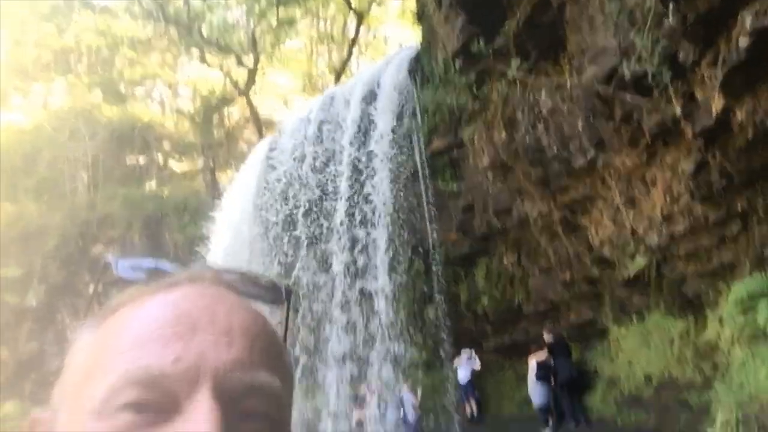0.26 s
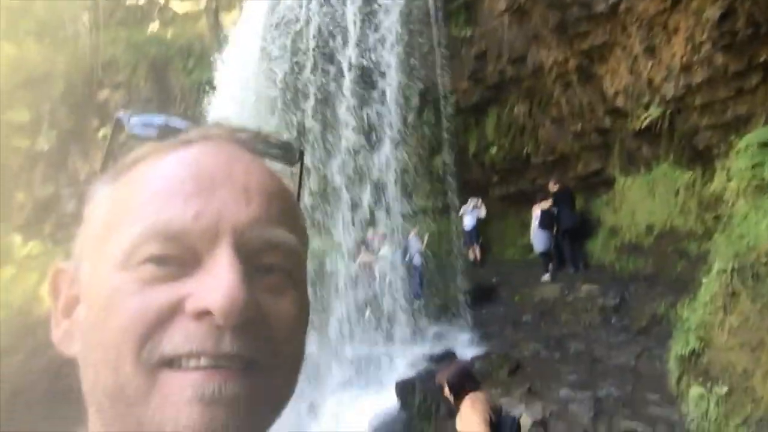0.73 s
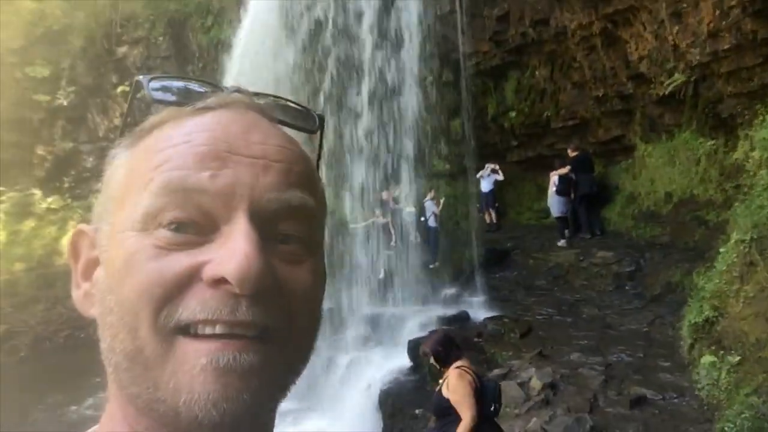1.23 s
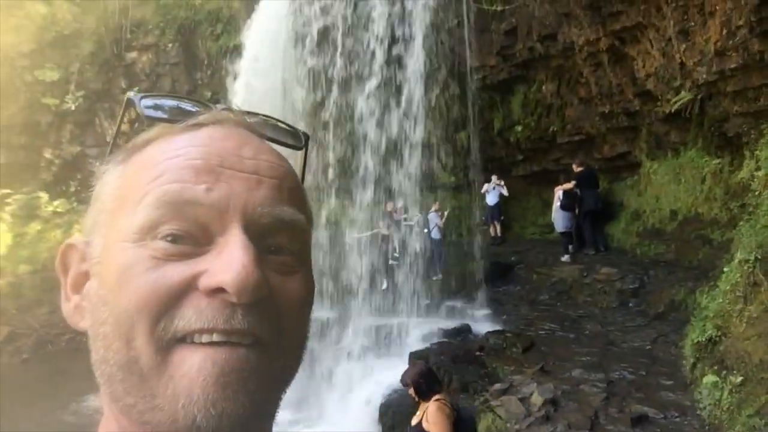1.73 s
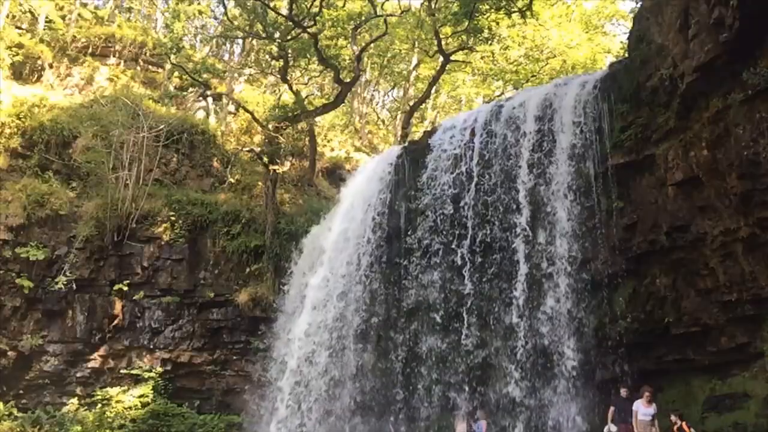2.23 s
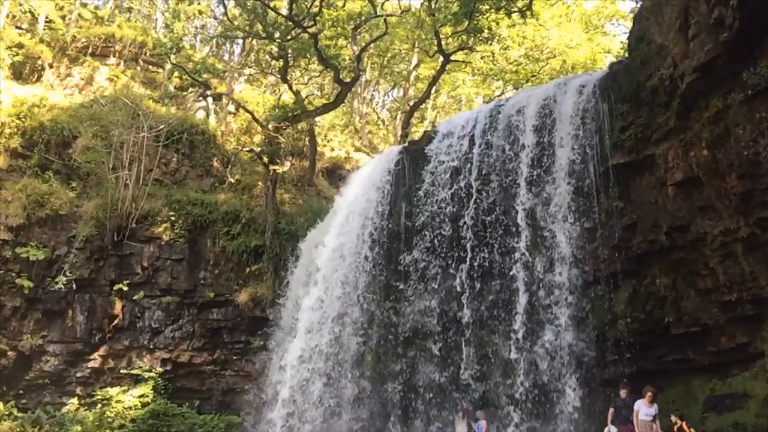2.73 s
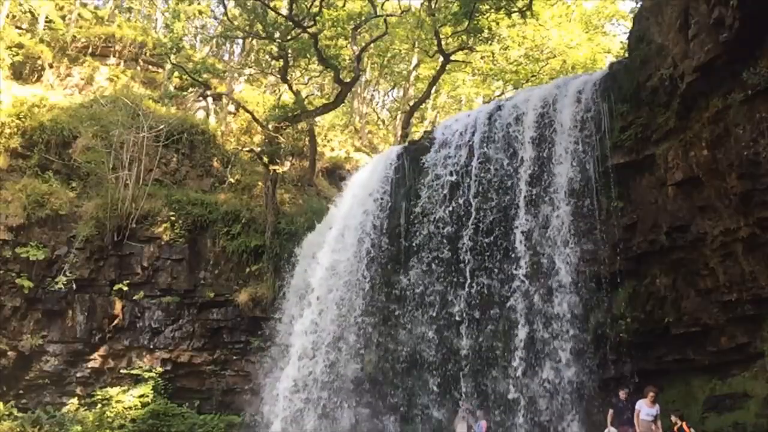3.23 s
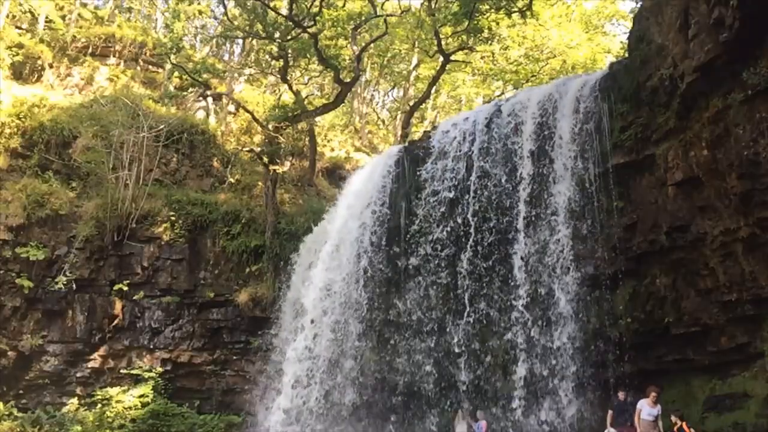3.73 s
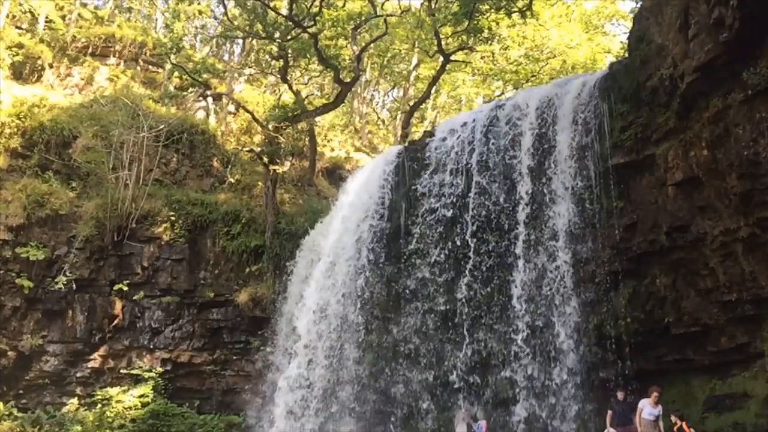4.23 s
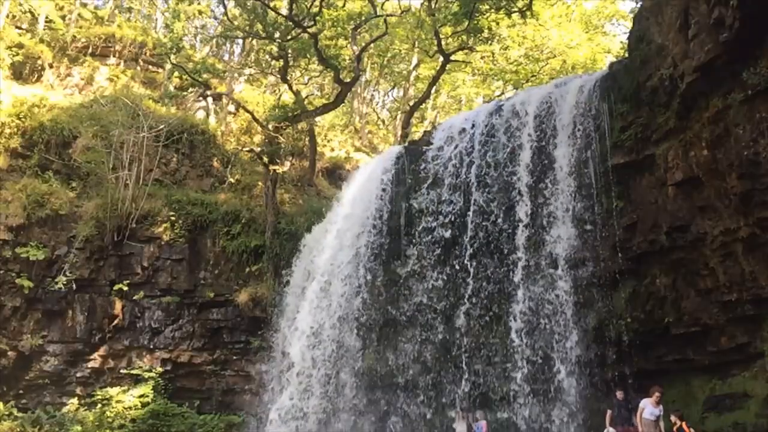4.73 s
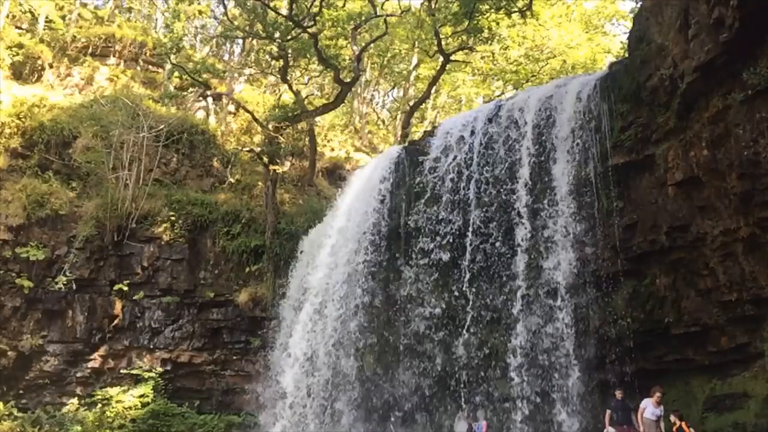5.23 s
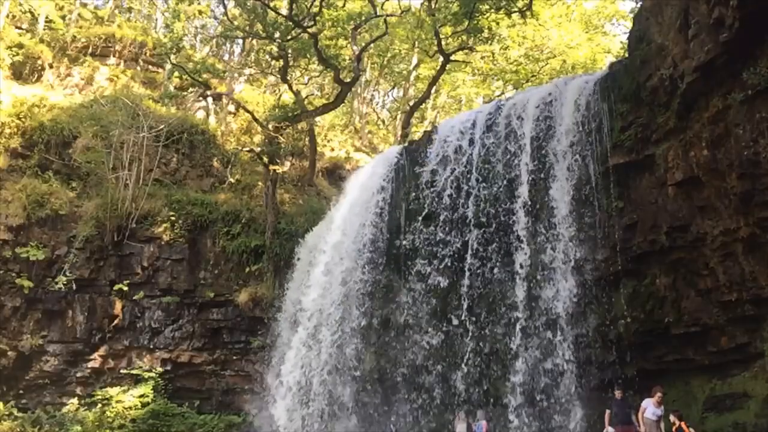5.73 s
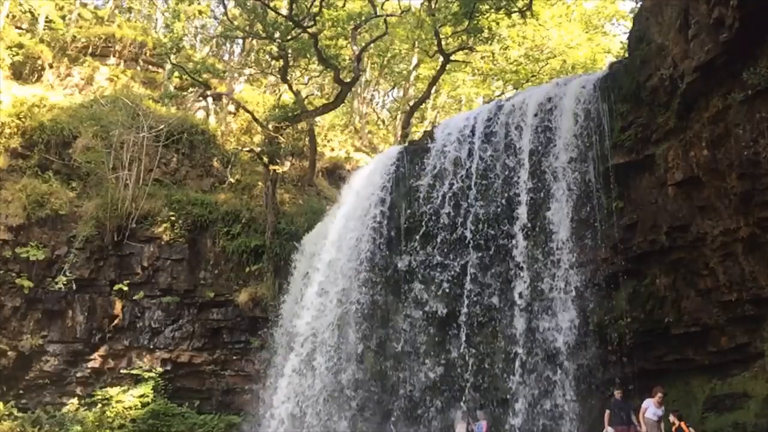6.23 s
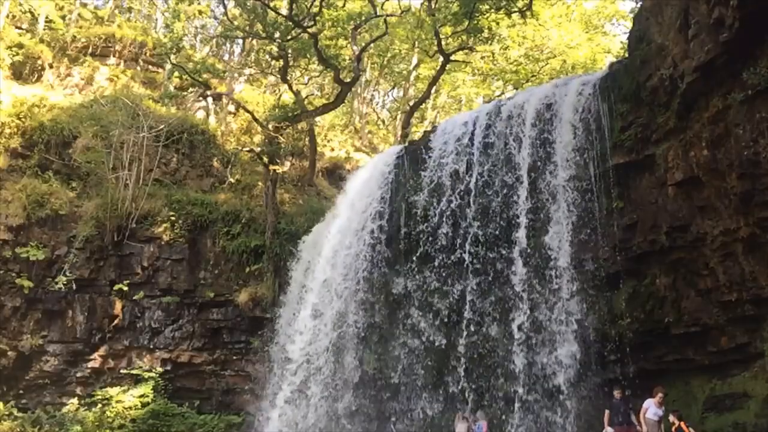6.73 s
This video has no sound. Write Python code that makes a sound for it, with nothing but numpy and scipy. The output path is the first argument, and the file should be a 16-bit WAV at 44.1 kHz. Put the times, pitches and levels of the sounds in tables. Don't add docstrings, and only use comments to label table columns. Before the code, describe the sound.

Waterfall roars broadly close by for two seconds with one small handling bump, then dips and becomes a deep, dull slow-motion rumble.

```python
import sys
import numpy as np
from scipy import signal
from scipy.fft import rfft, irfft, next_fast_len
from scipy.io import wavfile
from scipy.ndimage import uniform_filter1d, map_coordinates

SR = 44100
rng = np.random.default_rng(int(sys.argv[2]) if len(sys.argv) > 2 else 0)


def invert_db(x):
    u = np.asarray(x, float) / 20
    return 10 ** u


def int16_out(signal):
    q = np.round(np.clip(np.atleast_2d(signal).T, -1, 1) * 32767)
    wavfile.write(sys.argv[1], SR, q.astype(np.int16))


N = 307818

# frequency in Hz, density in dB per Hz.
NEAR_COLOUR = [(20, -40), (64, -12.5), (221, -5.5), (350, -6), (1400, -14), (2240, -11.5), (3600, -30),
               (4400, -33), (5100, -41), (6800, -24), (8300, -34), (9600, -31.5), (12000, -35),
               (15600, -49)]
# frequency as heard in Hz, density in dB per Hz.
SLOWED_COLOUR = [(3.5, -32.5), (6.0, 0.5), (25, -0.5), (59, -9.5), (122, -9), (191, -14), (245, -12),
                 (530, -12.5), (615, -15.5), (679, -12.5), (962, -17), (1120, -18), (1300, -22),
                 (1470, -23), (2300, -41), (2990, -78.5), (5060, -120)]
# frequency in Hz, width in Hz, gain in dB.
PORT_NOTCH = (10450, 610, -4)
# frequency in Hz, width in Hz, gain in dB.
HOLLOW = [
    (72.8, 20, 5),
    (135.5, 34, 3.5),
    (227.4, 44, 5.5),
    (2700, 510, 2.5),
]
# time in seconds, level over the steady flow in dB.
FLOW = [(0.0, -0.1), (.5, .3), (1.0, -0.14), (1.5, -.3), (2.1, 0.1), (2.7, 0.4), (3.3, 0.5), (3.8, -0.3),
        (4.3, .5), (4.9, .1), (5.5, -0.1), (6.0, 0.1), (6.4, 0.7), (7.0, 0.8)]
# time in seconds, rounding step over the usual level in dB.
STARVED = [(.105, 9), (.148, 8), (.425, 4), (.639, 4), (.83, 5), (1.022, 7), (1.107, 7), (1.257, 7),
           (1.492, 5), (1.704, 7), (1.769, 8), (2.728, 7), (3.304, 7), (3.368, 9), (5.202, 6), (6.057, 7),
           (6.27, 7), (6.462, 6)]
# frequency in Hz, step over the local level in dB.
COARSENESS = [(500, -14), (2000, -6), (3300, -0.1), (5200, 1.5), (7000, -3), (11000, -3), (15000, -0.2)]
# time in seconds, level in dB.
SPILL = [
    (3.021, -69),
    (3.602, -75),
    (3.962, -76),
    (4.645, -76),
    (5.384, -75),
    (5.579, -75),
]

SILENT_S = 2.111
SLOWING = 8
SLOW_SR = 48000 / SLOWING
HOP, FRAME_LAG = 1024, 942


def rms_one(x):
    return x / np.sqrt(np.mean(x ** 2) + 1e-20)


def drift(size, sr, rate):
    knots = rng.standard_normal(2000)
    position = np.arange(size) / sr * 2 * rate % 1990
    return map_coordinates(knots, [position], order=2)


def fade(away_s, length_s, curve):
    return np.sin(np.pi / 2 * np.clip(away_s / length_s, 0, 1)) ** curve


def resonance_db(hz, centre_hz, width_hz, peak_db):
    return peak_db / (1 + ((hz - centre_hz) / width_hz * 2) ** 2)


def spill():
    t = np.arange(N) / SR
    length_s, high_db = 0.012, -91
    gaps = []
    for edges_hz in ([2300, 8200], [8500, 9500]):
        band_pass = signal.butter(2, edges_hz, "band", fs=SR, output="sos")
        gaps.append(rms_one(signal.sosfilt(band_pass, rng.standard_normal(N))))
    low, high = gaps
    hiss = np.zeros(N)
    for start_s, level_db in SPILL:
        puff = np.exp(-0.5 * ((t - start_s) / length_s) ** 2)
        hiss += puff * (invert_db(level_db) * low + invert_db(high_db) * high)
    return hiss


def starve(x):
    lost_near_hz, lost_slowed_hz = 2860, 2100
    survivors, survive_above_hz, survivor_db = 2, 3400, 14
    fine = signal.resample_poly(x, 160, 147)
    fine = np.pad(fine, (2 * HOP - FRAME_LAG, 3 * HOP), "reflect")
    n, k = np.arange(2 * HOP), np.arange(HOP) + 0.5
    window = np.sin(np.pi * (n + 0.5) / (2 * HOP))
    cosines = np.cos(np.pi / HOP * np.outer(k, n + 0.5 + HOP / 2))
    basis = window * cosines * np.sqrt(2 / HOP)
    lines = np.lib.stride_tricks.sliding_window_view(fine, 2 * HOP)[::HOP] @ basis.T
    hz = k / HOP * 24000
    usual = np.sqrt(uniform_filter1d(lines ** 2, size=40, axis=1).clip(1e-16))

    scatter_db = 3.5 * rng.standard_normal((len(lines), HOP // 16)).repeat(16, axis=1)
    step = usual * invert_db(np.interp(hz, *np.transpose(COARSENESS)) + scatter_db)
    frames = [round((s * 48000 - FRAME_LAG) / HOP) + 1 for s, _ in STARVED]
    bass_relief = np.clip(hz / 1500, 0, 1)
    step[frames] = usual[frames] * invert_db(np.array(STARVED)[:, 1:] * bass_relief)
    strength = np.abs(lines)
    lines = step * np.round(lines / step)

    for frame, (start_s, _) in zip(frames, STARVED):
        kept = np.argsort(strength[frame] * (hz > survive_above_hz))[-survivors:]
        lost_hz = lost_near_hz if start_s < SILENT_S else lost_slowed_hz
        lines[frame, hz > lost_hz] = 0
        lines[frame, kept] = usual[frame, kept] * invert_db(survivor_db)
    halves = lines @ basis
    joined = (halves[:-1, HOP:] + halves[1:, :HOP]).ravel()[HOP - FRAME_LAG:]
    return signal.resample_poly(joined, 147, 160)[:N]


def bump(t):
    bump_s, width_s, push_lead_s, rebound_s = 1.9039, 0.00042, 0.001, 0.0014
    push_db, pull_db, rebound_db = -13.0, -10.5, -21.0
    push = invert_db(push_db) * np.exp(-0.5 * ((t - bump_s + push_lead_s) / width_s) ** 2)
    pull = invert_db(pull_db) * np.exp(-0.5 * ((t - bump_s) / width_s) ** 2)
    after = np.maximum(t - bump_s, 0) / rebound_s
    rebound = invert_db(rebound_db) * after ** 2 * np.exp(2 - 2 * after)
    return push - pull + rebound


def colour(points, hz, speed):
    corner_hz, level_db = np.transpose(points)
    density_db = np.interp(np.log(hz), np.log(corner_hz), level_db)
    return invert_db(density_db + resonance_db(hz / speed, *PORT_NOTCH))


def falling_water(size, sr, gain, split_hz, drops_per_s, drop_db, surge_db, patchy_db, patch_rate, count):
    struck = rng.random(size) < drops_per_s / sr
    impact_size = invert_db(4.03 * np.minimum(rng.exponential(1, size), 4))
    impacts = struck * impact_size * rng.choice([-1, 1], size)
    bubbles = rng.standard_normal(size)
    wide = next_fast_len(size)
    hz = np.maximum(np.fft.rfftfreq(wide, 1 / sr), 1)
    spectrum = rfft(bubbles + invert_db(drop_db) * impacts, wide) * gain(hz)

    surge = drift(size, sr, patch_rate / 2)
    parts = np.zeros((2, size))
    for centre_hz in 2 ** np.arange(2, np.log2(sr), 1 / count):
        distance = np.clip(count * np.log2(hz / centre_hz), -1, 1)
        share = np.cos(np.pi / 2 * distance) ** 2
        band = irfft(spectrum * share, wide)[:size]
        flicker_db = surge_db * surge + patchy_db * drift(size, sr, patch_rate)
        parts[int(centre_hz > split_hz)] += band * invert_db(flicker_db)
    return [rms_one(part) for part in parts]


def slowed_fall(t):
    rumble_db, roar_db = -28, -23.5
    slow_t = np.arange(int(N / SR * SLOW_SR) + 2) / SLOW_SR

    def gain(hz):
        droop = np.sinc(hz / SLOW_SR) ** 2
        return colour(SLOWED_COLOUR, hz, 1 / SLOWING) / droop * (hz < 2330)

    rumble, roar = falling_water(size=len(slow_t), sr=SLOW_SR, gain=gain, split_hz=55, drops_per_s=160,
                                 drop_db=-6.0, surge_db=0.34, patchy_db=0.3, patch_rate=6.0, count=2)
    samples = invert_db(rumble_db) * rumble + invert_db(roar_db) * roar
    fine_t = np.arange(len(slow_t) * SLOWING) / (SLOW_SR * SLOWING)
    straight = np.interp(fine_t, slow_t, samples)
    joined = signal.resample_poly(straight, 147, 160)[:N]
    return joined * fade(t - SILENT_S, length_s=0.043, curve=4.1)


def near_fall(t):
    plunge_db, spray_db = -29.5, -34
    t = t[t < SILENT_S]

    def gain(hz):
        lift_db = sum(resonance_db(hz, *row) for row in HOLLOW)
        return colour(NEAR_COLOUR, hz, 0.98) * invert_db(lift_db)

    plunge, spray = falling_water(size=len(t), sr=SR, gain=gain, split_hz=1500, drops_per_s=370,
                                  drop_db=0.5, surge_db=0.37, patchy_db=1.83, patch_rate=9.0, count=4)
    water = invert_db(plunge_db) * plunge + invert_db(spray_db) * spray
    faded = water * fade(SILENT_S - t, length_s=0.035, curve=4.8)
    return np.pad(faded, (0, N - len(t)))


def scene():
    t = np.arange(N) / SR
    flow = invert_db(np.interp(t, *np.transpose(FLOW)))
    water = flow * (near_fall(t) + slowed_fall(t))
    return (water + bump(t))[None]


def roll_off(x):
    return signal.sosfilt(signal.butter(12, 15741, fs=SR, output="sos"), x)


def record(dry):
    mix = starve(dry[0]) + spill()
    return roll_off(mix[None])


dry = scene()
out = record(dry)
int16_out(out)
```